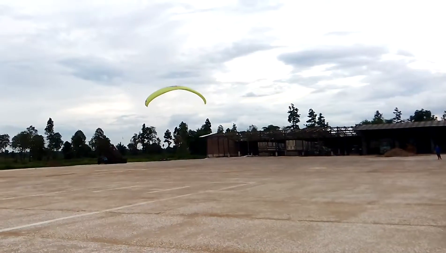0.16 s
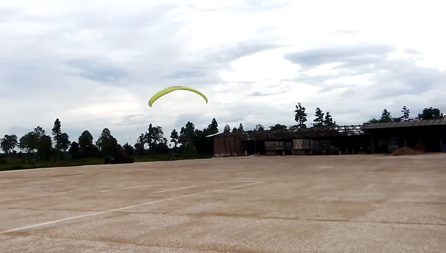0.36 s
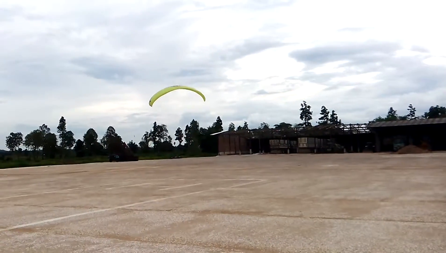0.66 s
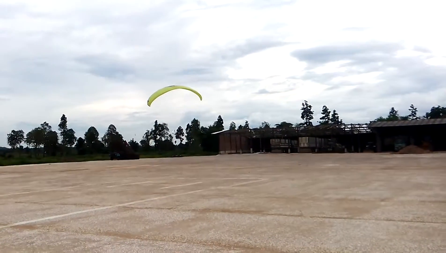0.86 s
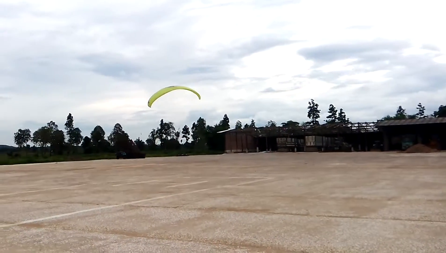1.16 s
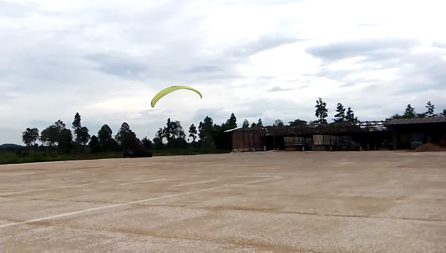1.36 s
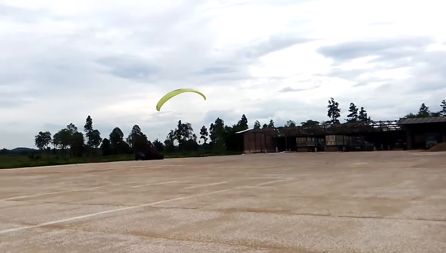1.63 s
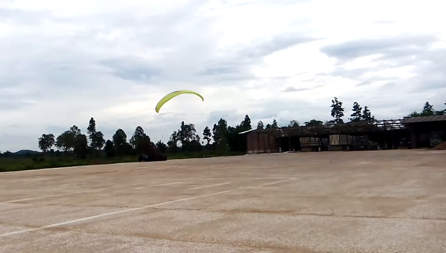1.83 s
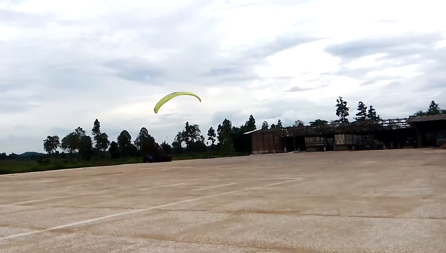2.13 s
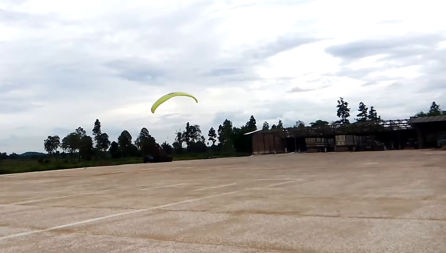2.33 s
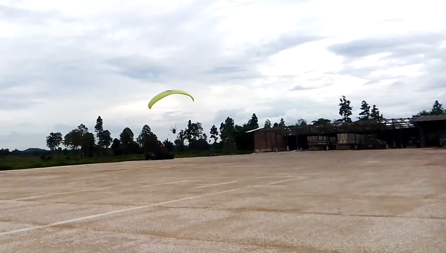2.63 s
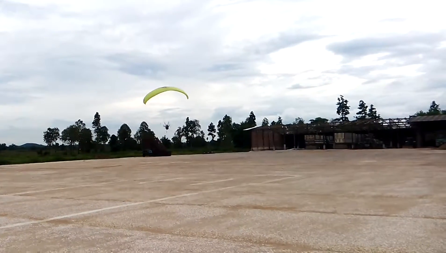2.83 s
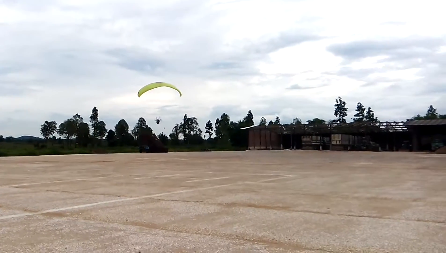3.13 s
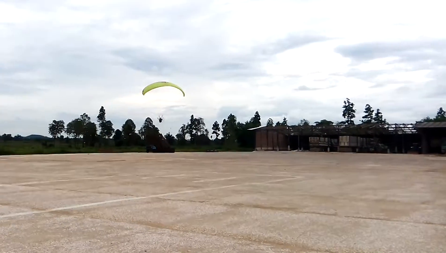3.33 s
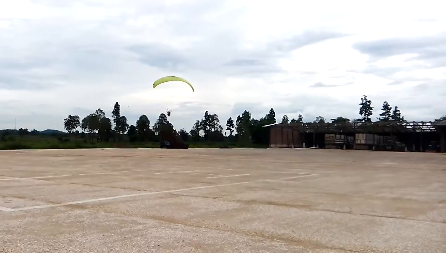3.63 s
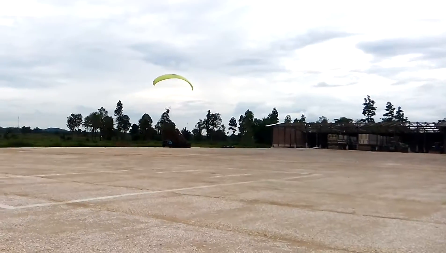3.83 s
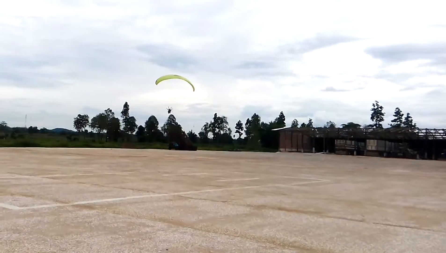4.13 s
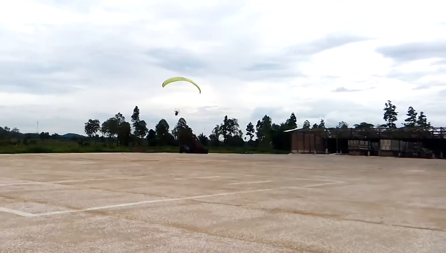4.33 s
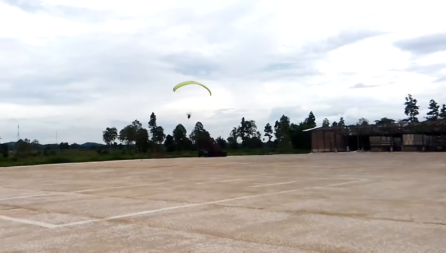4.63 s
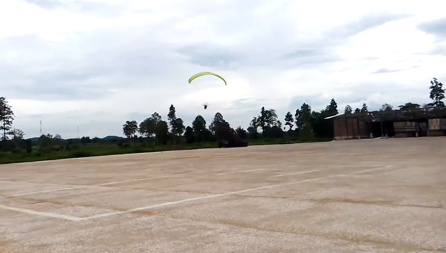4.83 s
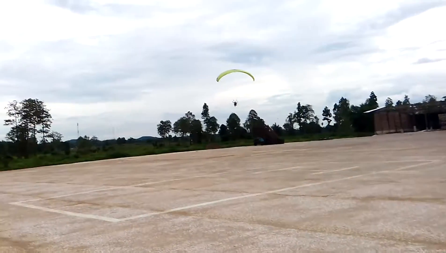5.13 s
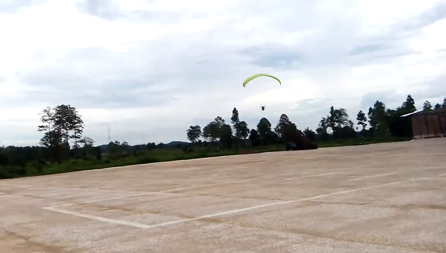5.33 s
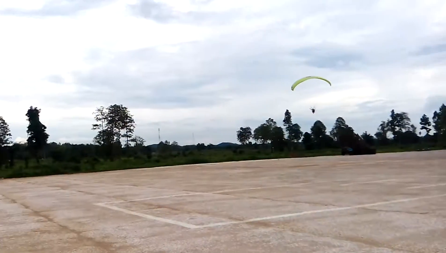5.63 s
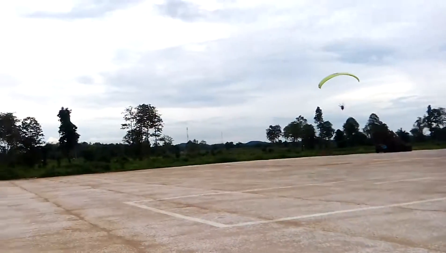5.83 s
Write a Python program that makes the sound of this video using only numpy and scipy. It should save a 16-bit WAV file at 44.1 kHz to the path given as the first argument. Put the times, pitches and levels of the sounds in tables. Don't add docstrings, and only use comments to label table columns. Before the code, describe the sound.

Outdoors on a wide paved field, a powered paraglider's small two-stroke motor drones continuously, a low raspy buzz chopped by the propeller, with exhaust roar and airy blade hiss. It starts strongest, then fades steadily as the craft climbs away. A brief belt whine appears around the middle. The handheld phone hears it in stereo from a distance, with a hollow ground-reflection colour and very faint low wind.

```python
import sys
import numpy as np
from scipy import signal
from scipy.fft import rfft, irfft, next_fast_len
from scipy.io import wavfile
from scipy.ndimage import uniform_filter1d, map_coordinates

SR = 44100
rng = np.random.default_rng(int(sys.argv[2]) if len(sys.argv) > 2 else 0)


def gain_from_decibels(decibels):
    exponent = np.asarray(decibels, float) / 20
    return 10 ** exponent


def generate_wav(signal):
    frames = np.transpose(np.atleast_2d(signal))
    scaled = np.clip(frames, -1, 1) * 32767
    pcm = np.round(scaled).astype(np.int16)
    wavfile.write(sys.argv[1], SR, pcm)


N = 263277
T = np.arange(N) / SR
LIFT_S, LIFT_LENGTH_S = 3.18, 0.6
SWING_S, SWING_LENGTH_S = 4.2, 1.92


def curves(table):
    s, *columns = np.transpose(table)
    return [np.interp(T, s, c) for c in columns]


def ramp(start_s, length_s):
    return 0.5 - 0.5 * np.cos(np.pi * np.clip((T - start_s) / length_s, 0, 1))


def colour(x, points, causal=False):
    hz, db = np.transpose(points)
    size = next_fast_len(N)
    f = np.maximum(np.fft.rfftfreq(size, 1 / SR), 1)
    gain = gain_from_decibels(np.interp(np.log(f), np.log(hz), db))
    if causal:
        cepstrum = irfft(np.log(gain), size)
        cepstrum[1:size // 2] *= 2
        gain = np.exp(rfft(cepstrum[:size // 2], size))
    return irfft(rfft(x, size) * gain, size)[..., :N]


def unit(x):
    return x / np.sqrt(np.mean(x ** 2))


def walk(rate_hz):
    k = int(SR / rate_hz)
    held = np.repeat(rng.standard_normal(N // 500), k)[:N]
    return unit(uniform_filter1d(uniform_filter1d(held, k), k))


def delay(x, ms):
    return map_coordinates(x, [np.arange(N) - ms * SR / 1000], order=3, mode="nearest")


def turn(hz):
    return 2 * np.pi * np.cumsum(hz) / SR


def tones(table, firing, shaft):
    total = 0
    for (m, n), (db, flicker_db) in table.items():
        level = np.sqrt(2) * gain_from_decibels(db + flicker_db * walk(14))
        total = total + level * np.sin(m * firing + n * shaft + 2 * np.pi * rng.random())
    return total


def patchy(points, flicker_db, rate_hz):
    size = next_fast_len(N)
    noise = rfft(rng.standard_normal((3, N)), size)
    low_hz, high_hz = points[0][0], points[-1][0]
    place = 2 * np.log2(np.maximum(np.fft.rfftfreq(size, 1 / SR), 1) / low_hz)
    total = 0
    for k in range(int(2 * np.log2(high_hz / low_hz)) + 2):
        band = irfft(noise * np.clip(1 - abs(place - k), 0, 1), size)[:, :N]
        total = total + gain_from_decibels(flicker_db * walk(rate_hz)) * band
    return unit(colour(total, points))


def distance_loss_db():
    start_m, speed_m_s, gain_m_s2 = 36, 8.16, 1.73
    return -20 * np.log10(1 + (speed_m_s * T + gain_m_s2 * T ** 2 / 2) / start_m)


def engine_phases():
    # time in seconds, pitch of the main chopped tone in Hz.
    pitch = [(0, 238.6), (.3, 239.1), (.45, 241.4), (.9, 242.9), (1.1, 241.6), (1.4, 242), (1.6, 240.1),
             (2.05, 239.7), (2.5, 243.1), (2.85, 243.5), (3.1, 239.6), (3.35, 239.6), (3.65, 244),
             (4.2, 245.2), (4.75, 242.9), (5.15, 244.2), (5.97, 241.6)]
    main_hz = uniform_filter1d(curves(pitch)[0], size=5000)
    blade_hz = 82.28 + 0.26 * T
    jitter_hz = 0.12 * walk(25) + 0.7 * walk(70)
    return turn(main_hz - blade_hz + jitter_hz), turn(blade_hz / 2)


def chopped_exhaust(firing, shaft, loss_db):
    near_tones = {(1, 2): (0.3, .5), (2, 4): (-28, 3), (3, 6): (-21, 3), (4, 4): (-17, 2.5),
                  (4, 2): (-22, 3), (4, -2): (-26, 3), (6, 0): (-16.5, 2.5), (5, 0): (-18, 3),
                  (5, 2): (-25, 3), (5, 4): (-19, 3), (0, 18): (-20, 3), (2, 2): (-25, 2.5),
                  (0, 12): (-29, 3)}
    rear_tones = {(1, 0): (-19, 2.1), (1, 1): (-20.5, 0.62), (1, 3): (-14, 0.63), (1, 4): (-26, 9.8),
                  (1, 5): (-30.5, 2.9), (0, 2): (-27.5, 0.57), (0, 3): (-50, 2), (0, 4): (-20.5, 0.3),
                  (0, 5): (-44.5, 1), (0, 7): (-45, 1), (0, 8): (-22, 3.9), (0, 10): (-29, 6.3),
                  (0, 16): (-22, 3.5), (2, 0): (-23, 3.9), (3, 0): (-26.5, 4.8), (9, 0): (-26, 4.3),
                  (12, 0): (-21.5, 0.23)}
    rear_fade, rear_db = 0.39, -9.5
    main_db = -16 + loss_db + 0.5 * walk(13)
    near = gain_from_decibels(main_db) * tones(near_tones, firing, shaft)
    return near + gain_from_decibels(rear_fade * main_db + rear_db) * tones(rear_tones, firing, shaft)


def pipe_howl(firing):
    tail = ramp(4.9, 0.25)
    level_db = -37 + 6.5 * tail + 1.0 * walk(40)
    wander_rad = (0.12 + 0.22 * tail) * walk(60)
    return gain_from_decibels(level_db) * np.sin(8 * firing + wander_rad)


def pipe_low_mode(firing):
    level_db = -32.5 + 6.5 * ramp(LIFT_S, LIFT_LENGTH_S) + 3.3 * walk(17)
    return gain_from_decibels(level_db) * np.sin(4 * firing)


def gas_roar(firing, shaft, loss_db):
    # frequency in Hz, density in dB per Hz.
    spectrum = [(60, -71), (130, -19), (240, 1), (340, -5), (450, -26), (560, 3.5), (700, 6.5), (850, 1),
                (990, 0.5), (1150, -29), (1600, -1.5), (2200, -17.5), (4000, -32)]
    puff = (1 + 0.58 * np.cos(firing)) * (1 + 0.4 * np.cos(2 * shaft))
    run_up_db = 4 * (1 - ramp(0, 0.8))
    lift_db = -1.5 * ramp(LIFT_S, LIFT_LENGTH_S)
    level_db = -29 + 0.24 * loss_db + run_up_db + lift_db
    return gain_from_decibels(level_db) * puff * patchy(spectrum, flicker_db=1.7, rate_hz=9)


def blade_hiss(firing, shaft, loss_db):
    # frequency in Hz, density in dB per Hz.
    spectrum = [(900, 6), (1500, -2.5), (2500, 4.5), (3600, 0), (4150, 3), (4700, -3), (5250, 4.5),
                (5800, -7.5), (6350, 0), (7000, -7.5), (8100, -16.5), (10500, -18), (12000, -30),
                (15300, -37)]
    # centre in seconds, length in seconds, rise in dB.
    gusts = [
        (0.099, 0.35, 3.5),
        (1.233, 0.2, 3),
        (3.09, 0.23, 3.5),
        (3.7, 0.3, 2),
        (4.243, 0.15, 1),
        (5.56, 0.1, 1),
    ]
    gust_db = sum(db * np.exp(-((T - s) / length_s) ** 2) for s, length_s, db in gusts)
    swish = (1 + 0.06 * np.cos(firing + 1)) * (1 + 0.061 * np.cos(2 * shaft + 2))
    level_db = -24 + 0.29 * loss_db + gust_db
    return gain_from_decibels(level_db) * swish * patchy(spectrum, flicker_db=1.03, rate_hz=16)


def field():
    # frequency in Hz, density in dB per Hz.
    spectrum = [(15, -1), (30, 5), (50, -47), (75, -12), (103, 6), (130, 2), (200, -49), (400, -70)]
    mid, side = colour(rng.standard_normal((2, N)), spectrum) * gain_from_decibels(0.55 * walk(2.86))
    return gain_from_decibels(-51.5) * unit(np.array([mid + 0.036 * side, mid - 0.042 * side]))


def ground_bounce(ports):
    # time in seconds, bounce lag in ms.
    climb = [
        (0, .42),
        (1.5, .43),
        (2.5, .45),
        (3, .49),
        (3.7, .58),
        (4.2, .645),
        (4.6, .72),
        (5.1, .77),
        (5.97, .815),
    ]
    lag_ms = curves(climb)[0]
    low_share = 0.7
    lift = ramp(LIFT_S, LIFT_LENGTH_S)
    dull = signal.lfilter(*signal.butter(1, 4200, fs=SR), ports) * (1 - (1 - low_share) * (1 - lift))
    gains = 0.7, 0.35
    return [(x + g * delay(d, lag_ms)) / (1 + g) for x, d, g in zip(ports, dull, gains)]


def holder_echo(right, swing):
    bright = signal.lfilter(*signal.butter(1, [1400, 5000], "band", fs=SR), right)
    lag_ms = 1.44 + 0.3 * ramp(4.5, 1.1)
    gain = 0.83 + (0.24 - 0.83) * swing
    return gain * delay(bright, lag_ms)


def belt_whine():
    start_s, length_s, edge_s = 2.4, 0.615, 0.1
    on = ramp(start_s, edge_s) - ramp(start_s + length_s, edge_s)
    progress = np.clip((T - start_s) / length_s, 0, 1)
    third_hz = 977 + 15 * np.sin(np.pi * progress ** 0.8)
    belt = turn(third_hz / 3)
    wave = np.sin(3 * belt) + 1.15 * np.sin(2 * belt) + 0.25 * np.sin(4 * belt)
    return on * gain_from_decibels(-28 + 1.1 * walk(35)) * wave


def scene():
    # frequency in Hz, scattered over direct noise in dB.
    scatter_share = [(30, -16), (250, -22), (500, -8), (800, -10), (1100, -4), (2500, -5), (6000, -6),
                     (8000, -3), (9000, 2), (15000, 5)]
    loss_db = distance_loss_db()
    firing, shaft = engine_phases()
    tone = chopped_exhaust(firing, shaft, loss_db) + pipe_howl(firing) + pipe_low_mode(firing) + belt_whine()
    noise, *scatter = gas_roar(firing, shaft, loss_db) + blade_hiss(firing, shaft, loss_db)
    swing = ramp(SWING_S, SWING_LENGTH_S)
    scattered = gain_from_decibels(0.5 * swing) * colour(np.array(scatter), scatter_share)
    left, right = ground_bounce(tone + noise + scattered)
    right = right + holder_echo(right, swing)
    port_lag_ms = 0.15 + (0.018 - 0.15) * swing
    return np.array([left, delay(right, port_lag_ms)]) + field()


def top_cut(x):
    return signal.sosfilt(signal.butter(12, 15350, fs=SR, output="sos"), x)


def record(dry):
    # frequency in Hz, gain in dB.
    cavity = [(110, -2.8), (350, 1.5), (650, -5.5), (950, -1.5), (1300, -1.5), (2400, -11), (3800, -1),
              (4700, -3), (5250, 4), (5800, 7), (6250, 2.5), (8200, -1), (10500, -24.5), (11500, -8)]
    right = colour(dry[1], cavity, causal=True)
    right = colour(right, [(10700, 0), (11500, -50)])
    return top_cut(np.array([dry[0], right]))


dry = scene()
out = record(dry)
generate_wav(out)
```